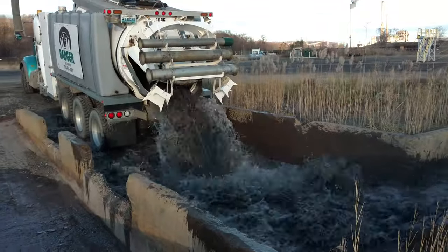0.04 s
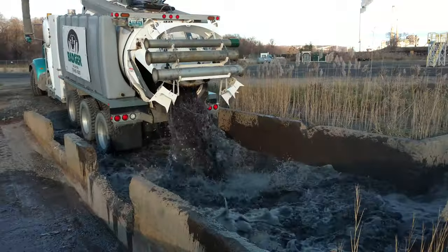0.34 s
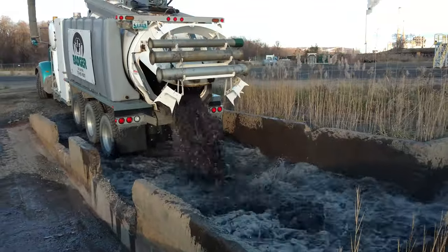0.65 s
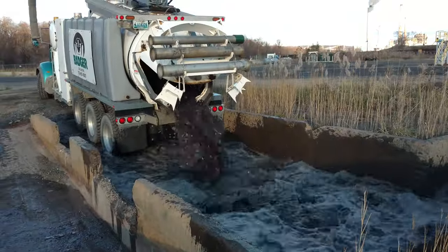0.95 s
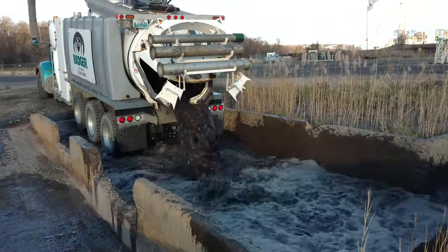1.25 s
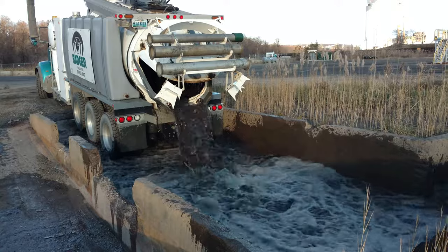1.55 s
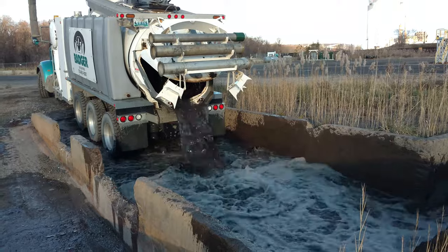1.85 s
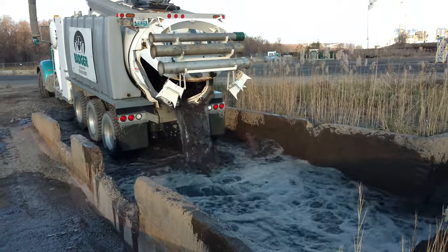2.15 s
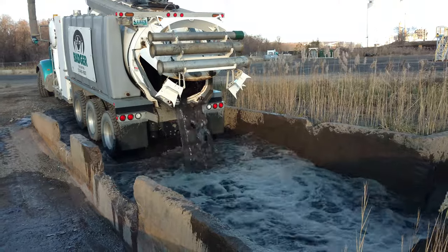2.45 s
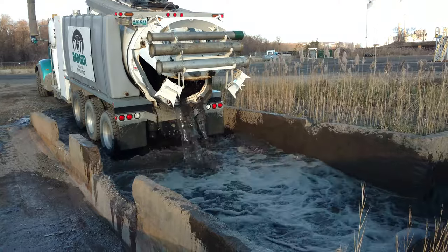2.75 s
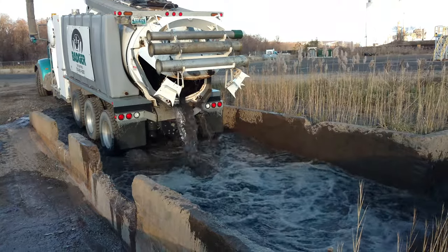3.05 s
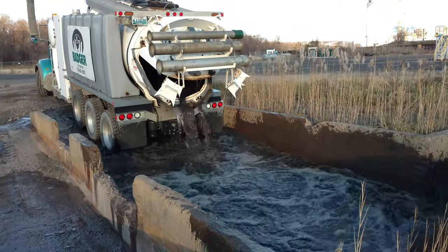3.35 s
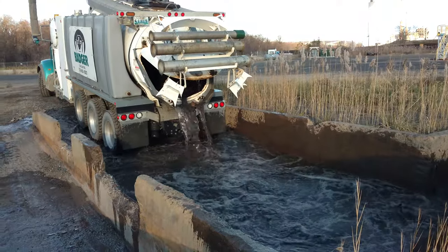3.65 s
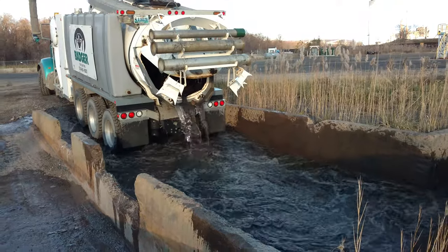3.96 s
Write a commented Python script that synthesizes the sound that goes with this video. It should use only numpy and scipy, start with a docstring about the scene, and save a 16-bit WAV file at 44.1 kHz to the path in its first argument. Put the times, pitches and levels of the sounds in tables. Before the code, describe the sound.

Slurry splashes into a churning pool with hissing spray, wet slaps and deep gurgles, then eases to a lighter pour. Behind it, a truck's diesel engine holds a fast idle, heard outdoors through a stereo microphone.

```python
"""Muddy slurry gushes, splashes and gurgles into a concrete pit, over the hum of a diesel engine.
The stream comes from a vacuum truck running at a fast idle, and churns the pool into bubbles and spray.
For the first two seconds heavy lumps slap in and trap gulps of air; then the flow thins.
A close pair of microphone ports (sound inlets), widened electronically, picks it up outdoors."""
import sys
import numpy as np
from scipy import signal
from scipy.fft import rfft, irfft
from scipy.io import wavfile
from scipy.ndimage import uniform_filter1d

SR = 44100
rng = np.random.default_rng(int(sys.argv[2]) if len(sys.argv) > 2 else 0)


def put_to_file(sound):
    """Save the sound as 16-bit audio at rate SR, in the file named by the first command-line argument."""
    columns = np.atleast_2d(sound).T  # one column per channel
    safe = np.clip(columns, -1, 1)
    whole_steps = np.round(safe * 32767)
    wavfile.write(sys.argv[1], SR, whole_steps.astype(np.int16))


N = 176400  # four seconds

# How loud the churning pool is. Each row: time in seconds, level in dB.
POOL_LEVEL = [(0, -23.5), (.08, -23), (.25, -25.5), (.39, -26), (.46, -28), (.6, -25.5), (.7, -27.5),
              (.8, -27.5), (1.05, -25.5), (1.28, -27), (1.45, -29), (1.72, -27.5), (1.95, -29), (2.1, -29),
              (2.18, -26.5), (2.9, -27), (3.0, -29.5), (3.22, -27.5), (3.32, -23.5), (3.7, -26.5),
              (3.8, -26), (4, -28)]
# The tone of the pool. Each row: frequency in Hz, relative strength in dB.
POOL_TONE = [(100, -29), (250, -4.5), (370, -10.5), (440, -10.5), (560, -1.5), (700, -0.5), (950, -5),
             (1300, 1.5), (1550, -5.5), (1820, -1.5), (2200, -8), (3000, -10.5), (6000, -21), (16000, -33)]
# How loud the spray is. Each row: time in seconds, level in dB.
SPRAY_LEVEL = [(0, -30.5), (.2, -28.5), (.48, -31.5), (.63, -27.5), (.78, -29), (.95, -29.5), (1.2, -30),
               (1.39, -30.5), (1.44, -35), (1.55, -32), (1.85, -30.5), (1.95, -34), (2.03, -30),
               (2.42, -31), (2.65, -28.5), (2.88, -31.5), (2.98, -33), (3.2, -31), (3.3, -31), (3.75, -31),
               (4, -32.5)]
# The tone of the spray. Each row: frequency in Hz, relative strength in dB.
SPRAY_TONE = [(800, -39), (2000, -23), (2800, 1), (3600, -1.5), (4700, -7), (5800, -7.5), (6700, -10),
              (8000, -10.5), (10000, -14), (12000, -15), (15000, -21)]
# Sheets of water smacking down. Each row: start in seconds, level in dB, fade time in seconds.
SHEET_SMACKS = [(.27, -27, 0.0088), (.885, -24, 0.0067), (1.155, -28, 0.065), (1.642, -36, 0.011),
                (2.355, -27, .012), (2.82, -25.5, .01), (3.27, -25, 0.014), (3.297, -30.5, .012)]
# Lumps of mud hitting the pool.
# Each row: start in seconds, level in dB, fade time in seconds, centre of the splash in Hz.
LUMP_SLAPS = [(.018, -21, 0.071, 880), (0.267, -24.5, 0.04, 402), (.757, -17.5, 0.026, 1090),
              (0.787, -19.5, 0.031, 676), (0.824, -22, 0.048, 530), (.893, -30, 0.009, 700),
              (0.946, -23, 0.089, 540), (1.161, -23.5, 0.055, 570), (1.318, -24.5, 0.081, 644),
              (1.39, -20.5, 0.011, 610), (1.404, -17, 0.0045, 950), (1.485, -19.5, 0.017, 900),
              (1.495, -17.5, 0.012, 650), (1.639, -15, 0.024, 1070), (1.745, -25.5, 0.035, 860)]
# The tone of a slap. Each row: multiple of its centre frequency, relative strength in dB.
SLAP_TONE = [(.06, -45), (.14, -25), (.3, -2.5), (.5, -4), (1, 7.5), (1.4, 6), (2.3, -3), (3.3, -1),
             (6.5, -25), (25, -47)]
# Air pockets ringing under the lumps.
# Each row: start in seconds, pitch in Hz, peak level in dB, rise time and fade time in seconds.
AIR_POCKETS = [(0.055, 189, -23.5, 0.0057, 0.021), (0.271, 290, -24, 0.0046, .012),
               (.299, 244, -15.5, 0.0049, 0.0051), (0.318, 218, -22, 0.018, 0.022),
               (.344, 221, -17.5, 0.02, 0.015), (.384, 620, -23, 0.011, 0.0091),
               (.786, 453, -20, 0.0093, 0.0045), (.787, 822, -14, .006, .005),
               (.795, 664, -16.5, 0.01, 0.013), (0.858, 223, -19, .016, 0.013),
               (.894, 860, -23, 0.0045, 0.0082), (.944, 644, -18, 0.0058, 0.0072),
               (0.952, 226, -21, 0.0088, 0.014), (0.963, 496, -20, 0.0047, 0.014),
               (1.389, 245, -16, 0.0061, 0.0043), (1.4106, 617, -6, .005, 0.0019),
               (1.493, 330, -18, 0.0066, 0.0092), (1.658, 230, -17.5, .008, 0.0073),
               (1.696, 184, -23, .008, .012), (1.772, 247, -25, 0.027, 0.014)]
# How loud the deep plunge under the stream is. Each row: time in seconds, level in dB.
PLUNGE_LEVEL = [(0, -38), (.3, -31.5), (.46, -38), (.7, -36), (.87, -31.5), (1.1, -30.5), (1.45, -46.5),
                (1.58, -32), (1.78, -35), (2.0, -43), (3.0, -44), (3.35, -39), (4, -46)]
# The tone of the plunge. Each row: frequency in Hz, relative strength in dB.
PLUNGE_TONE = [(30, -46), (85, -32), (130, -12), (175, -6), (220, 1), (280, -4.5), (400, -7), (700, -11.5),
               (2000, -55)]
# The notes in the engine's hum. Each row: multiple of the crankshaft speed, average level in dB.
ENGINE_NOTES = [(3, -66), (4.25, -58), (4.5, -55), (5.5, -57), (6, -46.5), (7, -47.5), (7.5, -53.5),
                (8, -54), (9, -51), (9.5, -58), (10, -45), (11.3, -53), (13, -53.5), (14, -45), (21, -55),
                (22.6, -48), (26.8, -47), (29, -49), (31, -47), (31.5, -50), (33, -49), (37, -45.5)]
# The tone of the engine's rumble. Each row: frequency in Hz, relative strength in dB.
RUMBLE_TONE = [(20, -27), (40, -19), (65, -9), (90, 9), (150, 4), (250, -1), (400, -23), (1000, 9),
               (4000, -50)]
# How loud the engine is at the microphone, fainter at first. Each row: time in seconds, gain in dB.
ENGINE_HEARD_LEVEL = [(0, -2), (1.0, -2.5), (1.9, 0), (2.5, -0.5), (4, 0.5)]
# How unlike the two ports are for sound that comes from all around.
# Each row: frequency in Hz, level of their difference against their shared part in dB.
PORT_DIFFERENCE = [(25, -19), (60, -10), (125, -9.5), (250, -19), (500, -15), (900, -9.5), (1700, -2.5),
                   (2600, -9.5), (5000, 0), (15000, -1.5)]
# Which port is louder. Each row: frequency in Hz, left minus right in dB.
PORT_BALANCE = [(50, .1), (300, 2.5), (600, 1.3), (1800, -5), (3200, 2), (4400, -2), (6000, 3.5), (8500, 3),
                (11500, 3), (15000, 1)]
# How much of the other port is subtracted. Each row: frequency in Hz, gain in dB.
PORT_SUBTRACTION = [(50, -1), (1200, -1.5), (2600, -1.7), (5200, -4.5), (7800, -4.5), (10400, -6),
                    (13000, -5), (15000, -4.5)]
# How much of the other output is fed back. Each row: frequency in Hz, share from 0 to 1.
OUTPUT_FEEDBACK = [(1300, 0), (2800, 0), (15000, 0.2)]


def churning_pool(bubbles_db=-2, surge_db=1.06):
    """The stream churns the pool into a surging wash full of ringing bubbles."""
    wash = shape_tone(surrounding_noise(patchy_db=1.5), POOL_TONE)
    bubbles = tiny_rings(447, 2504, pitches=44, per_s=1800, cycles=3.96, glide=0.042,
                         size_db=1, spread_s=0.00021)
    churn = wash + amp(bubbles_db) * shape_tone(bubbles, POOL_TONE)
    return churn * level_curve(POOL_LEVEL) * amp(surge_db * drift(rate_hz=19))


def spray(drops_db=-2, flicker_db=0.54):
    """Sheets of spray hiss and smack down while single drops crackle on water and concrete."""
    hiss = shape_tone(surrounding_noise(patchy_db=2), SPRAY_TONE)
    drops = tiny_rings(2010, 15500, pitches=60, per_s=3200, cycles=0.97, glide=0.032,
                       size_db=2, spread_s=0.00031)
    spatter = hiss + amp(drops_db) * shape_tone(drops, SPRAY_TONE)
    smacks = sum(burst(start, db, fade) for start, db, fade in SHEET_SMACKS)
    loudness = np.hypot(level_curve(SPRAY_LEVEL), smacks)  # their powers add
    return spatter * loudness * amp(flicker_db * drift(rate_hz=18))


def mud_slaps():
    """Each lump throws up a short burst of splash, some dull and some bright."""
    splash, out = surrounding_noise(patchy_db=2.5), np.zeros((2, N))
    for start, db, fade, centre_hz in LUMP_SLAPS:
        tone = [(centre_hz * multiple, gain_db) for multiple, gain_db in SLAP_TONE]
        out += burst(start, db, fade) * shape_tone(splash, tone)
    return out


def air_gulps(glide_per_s=0.38):
    """Large pockets of trapped air swell and ring briefly, rising slightly in pitch."""
    out = np.zeros(N)
    for start, hz, db, rise, fade in AIR_POCKETS:
        age = np.maximum(np.arange(N) / SR - start, 0)
        swell = np.sin(np.pi / 2 * np.minimum(age / rise, 1)) ** 2
        tail = np.exp(-np.maximum(age - rise, 0) / fade)
        out += amp(db) * swell * tail * np.sin(2 * np.pi * hz * (age + glide_per_s * age ** 2 / 2))
    return out


def deep_plunge():
    """Clouds of air rumble as they are driven deep into the pool."""
    return shape_tone(surrounding_noise(patchy_db=4.5), PLUNGE_TONE) * level_curve(PLUNGE_LEVEL)


def diesel_engine(crank_hz=23.315, clatter_db=-37, rumble_db=-43, wander=0.0014, flutter=0.19):
    """A wavering hum and a dense clatter follow the turning crankshaft, over a low rumble."""
    turns = np.cumsum(crank_hz * (1 + wander * drift(rate_hz=3.8))) / SR
    turns = turns + crank_hz * np.array([[0.00005], [0]])  # the left port hears it 0.05 ms sooner
    hum = 0
    for multiple, db in ENGINE_NOTES:
        strength = amp(db) * np.sqrt(2) * (1 + flutter * drift(rate_hz=6.1))
        hum += strength * np.sin(2 * np.pi * (multiple * turns + rng.random()))
    clatter = sum(rng.rayleigh() * np.sin(2 * np.pi * (multiple * turns + rng.random()))
                  for multiple in range(21, 82))
    rumble = amp(rumble_db) * shape_tone(surrounding_noise(patchy_db=-1.5), RUMBLE_TONE)
    return (hum + amp(clatter_db) * unit(clatter) + rumble) * level_curve(ENGINE_HEARD_LEVEL)


def tiny_rings(low_hz, high_hz, pitches, per_s, cycles, glide, size_db, spread_s):
    """Bubbles or drops ring at random moments with a rising note, each pitch from its own direction."""
    out, t = np.zeros((2, N)), np.arange(4096) / SR
    for hz in np.linspace(low_hz, high_hz, pitches):
        lag_s = rng.uniform(-1.056, 1) * spread_s / 2  # early at one port, late at the other
        fade_s = cycles / hz * rng.uniform(0.81, 1.15)
        age = np.maximum(t - .001 + np.array([[lag_s], [-lag_s]]), 0) / fade_s  # counted in fade times
        phase = 2 * np.pi * hz * fade_s * (age + glide * np.minimum(age, 10) ** 2 / 2)
        ring = unit((1 - np.exp(-10 * age)) * np.exp(-age) * np.sin(phase))
        starts = rng.random(N) < per_s / pitches / SR
        hits = starts * amp(size_db * np.minimum(rng.exponential(1, N), 4))
        out += signal.oaconvolve(hits[None], ring, axes=1)[:, :N]
    return unit(out)


def surrounding_noise(patchy_db):
    """Hiss from all around the two ports, with short random louder and softer patches."""
    a, b, c, d, patches = rng.standard_normal((N // 128 + 5, 257, 5)).T
    patches = uniform_filter1d(patches, size=6, axis=0)  # smooth across frequency
    patches = unit(uniform_filter1d(patches, size=9, axis=1))  # and across time
    spectra = np.array([a + 1j * b, c + 1j * d]) * amp(patchy_db * patches)
    shared, side = signal.istft(spectra, nperseg=512, noverlap=384)[1][:, :N]
    side = irfft(rfft(side) * amp(look_up(PORT_DIFFERENCE)), N)
    return unit(np.array([shared + side, shared - side]))


def burst(start, db, fade, rise_s=0.0045):
    """A loudness curve that jumps up quickly and dies away."""
    age = np.arange(N) / SR - start
    return amp(db) * np.clip(age / rise_s, 0, 1) * np.exp(-np.maximum(age - rise_s, 0) / fade)


def drift(rate_hz):
    """A smooth random wobble, mostly slower than the given rate."""
    hz = np.fft.rfftfreq(N, 1 / SR)
    return unit(irfft(rfft(rng.standard_normal(N)) * (hz > 0) / (1 + (hz / rate_hz) ** 4), N))


def shape_tone(sound, tone):
    """Filters a sound by a tone table and sets its average power to 1."""
    return unit(irfft(rfft(sound) * amp(look_up(tone)), N))


def look_up(table):
    """A table's value at every frequency, joining its rows along a musical (log) scale."""
    hz, value = np.transpose(table)
    return np.interp(np.log(np.fft.rfftfreq(N, 1 / SR) + 1), np.log(hz + 1), value)


def level_curve(table):
    """Turns rows of time and dB into a gain for every sample."""
    return amp(np.interp(np.arange(N) / SR, *np.transpose(table)))


def amp(db):
    """Turns decibels into a number to multiply by."""
    return 10 ** (np.asarray(db) / 20)


def unit(x):
    """Scales a signal to an average power of 1."""
    return x / np.sqrt(np.mean(x ** 2) + 1e-20)


def scene():
    """The engine and the pouring slurry as they reach the two ports."""
    return diesel_engine() + churning_pool() + deep_plunge() + mud_slaps() + air_gulps() + spray()


def record(dry):
    """Widens the sound by subtracting a delayed copy of each port from the other, then trims the top."""
    delay_s, cutoff_hz = 0.000385, 15200
    hz = np.fft.rfftfreq(N, 1 / SR)
    ports = rfft(dry) * amp(look_up(PORT_BALANCE) * np.array([[.5], [-.5]]))
    delay = np.exp(-2j * np.pi * hz * delay_s)
    subtract = np.minimum(amp(look_up(PORT_SUBTRACTION)), .95) * delay
    feedback = look_up(OUTPUT_FEEDBACK) * delay  # narrows the dips that subtracting cuts in the tone
    # Dividing by this brings back the lost bass and evens out the peaks.
    widening_gain = np.where(hz < 1 / (2 * delay_s), 1 - subtract, 1 + abs(subtract)) / (1 + abs(feedback))
    crossed = (ports - subtract * ports[::-1]) / widening_gain
    wide = irfft((crossed + feedback * crossed[::-1]) / (1 - feedback ** 2), N)
    treble_cut = signal.firwin(511, cutoff_hz, window=("kaiser", 9), fs=SR)
    return signal.oaconvolve(wide, treble_cut[None], "same")


dry = scene()
out = record(dry)
put_to_file(out)
```